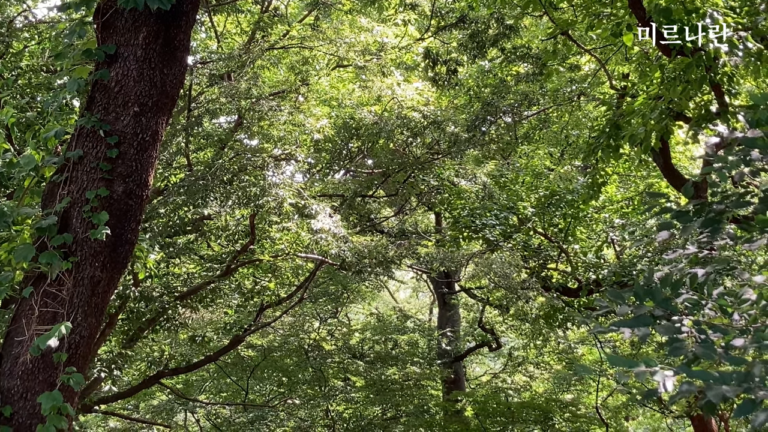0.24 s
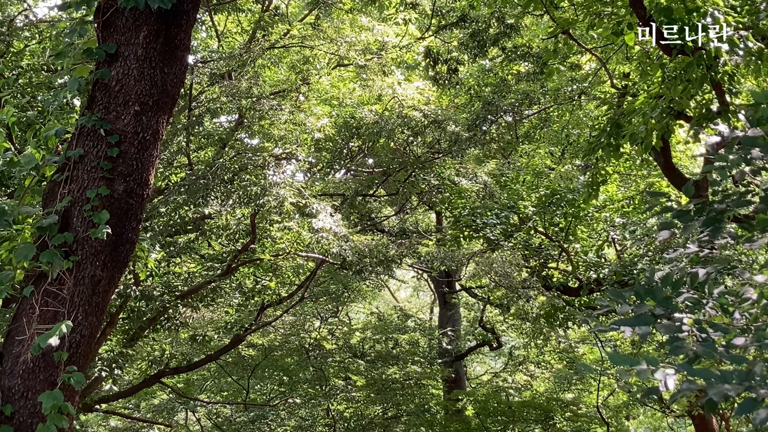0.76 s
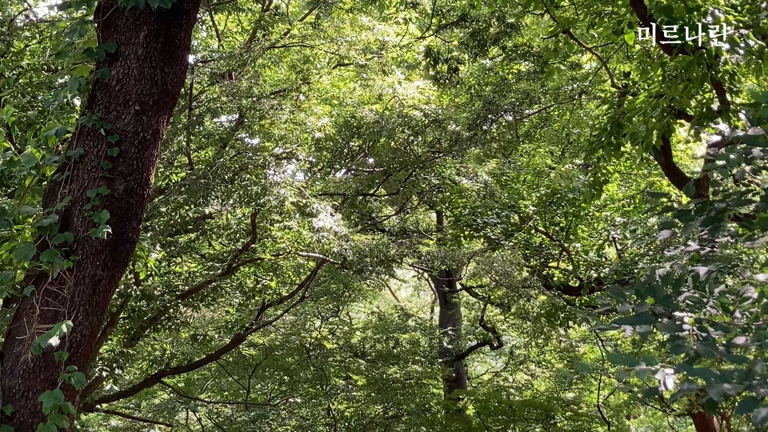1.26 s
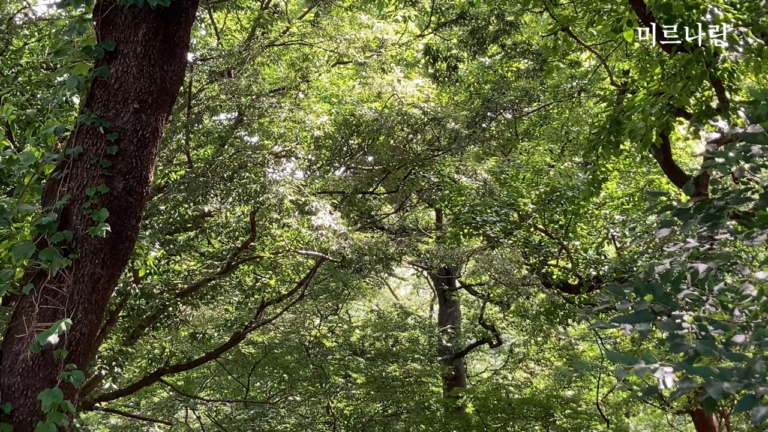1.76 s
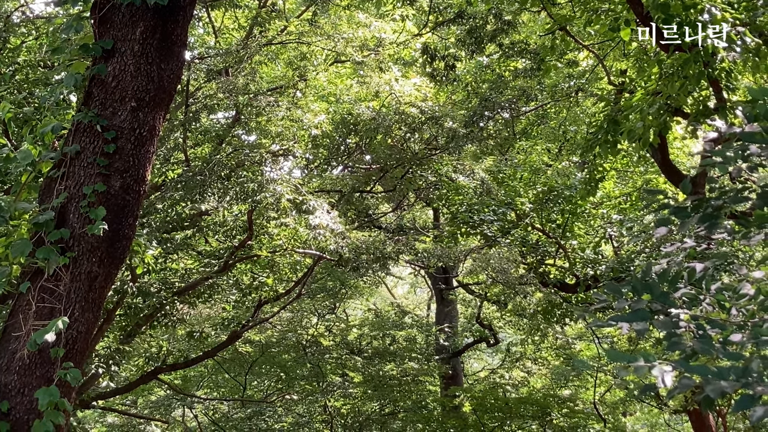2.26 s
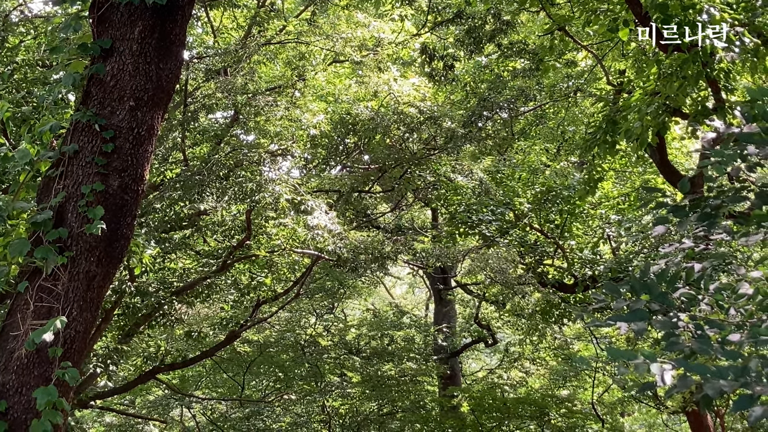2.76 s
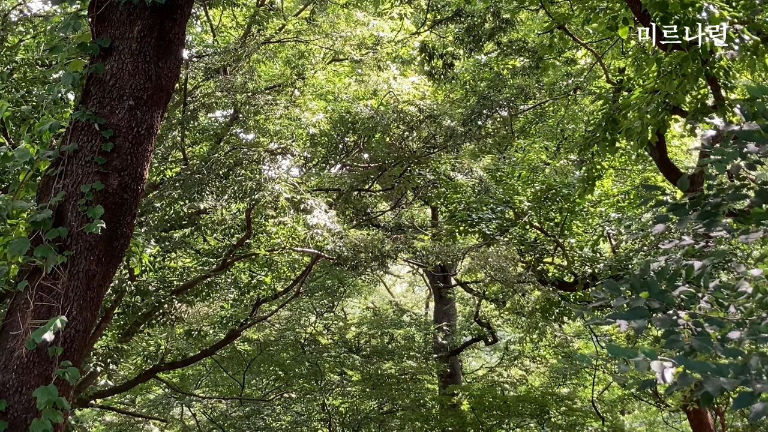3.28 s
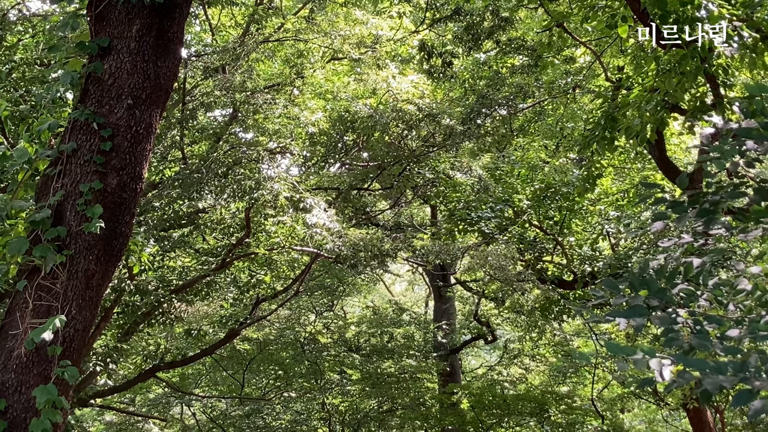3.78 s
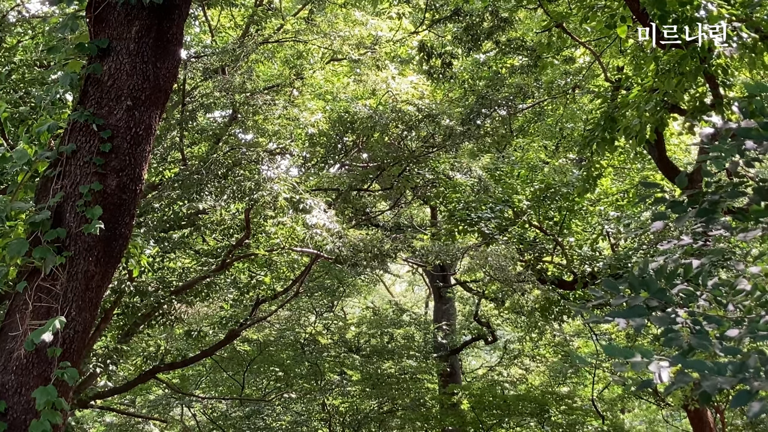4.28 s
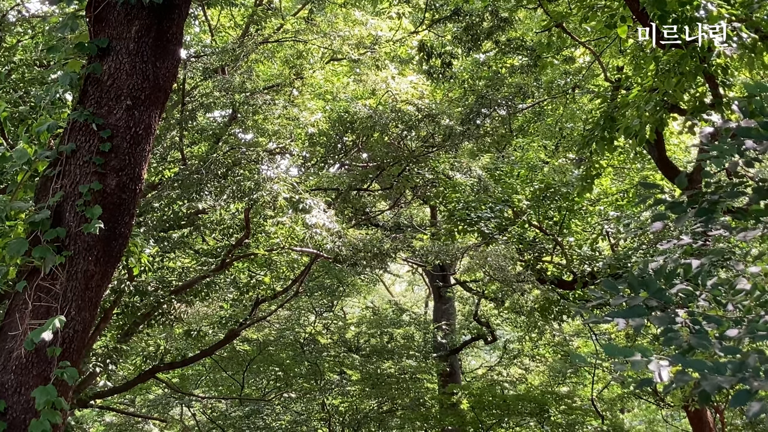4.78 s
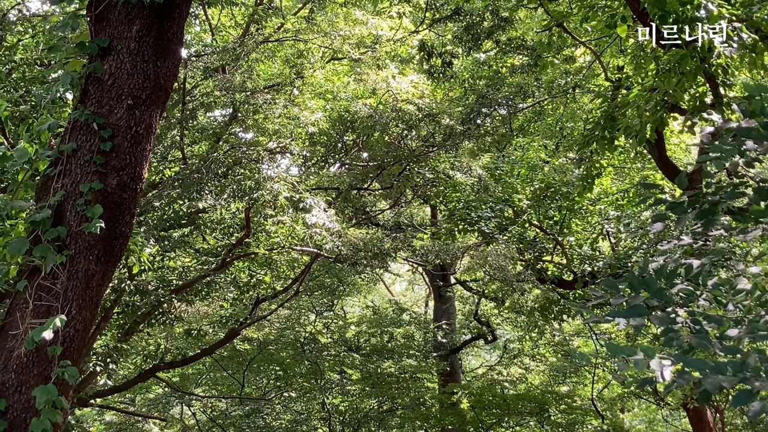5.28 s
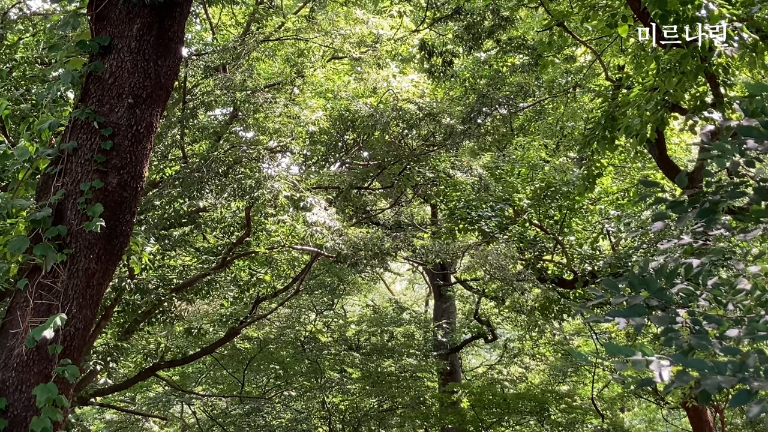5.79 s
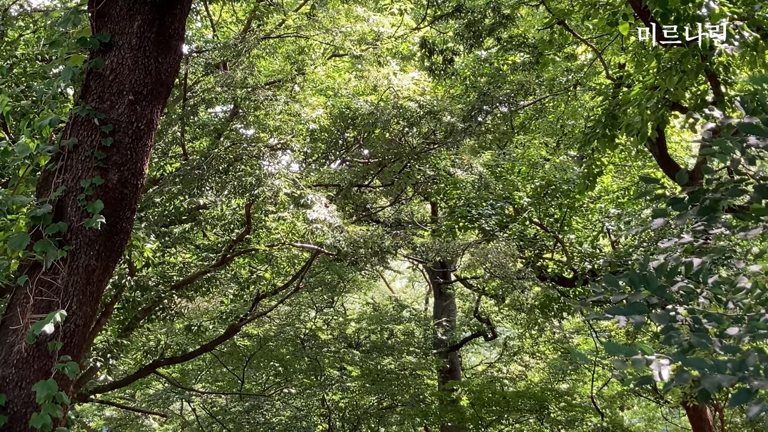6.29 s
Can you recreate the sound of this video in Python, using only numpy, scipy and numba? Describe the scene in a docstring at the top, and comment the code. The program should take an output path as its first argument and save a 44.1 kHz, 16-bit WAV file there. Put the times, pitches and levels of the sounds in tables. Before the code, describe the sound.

Stereo outdoor microphone among trees: far cicadas form a continuous airy hiss with a blurred midrange shimmer. A closer cicada wakes with a quiet drone, strengthens into regular pulsed rising buzzes, slows slightly at the end and stops. Its rapid clicking fuses into a rough tone, scattered briefly by leaves. Three dull little knocks and a faint rubbing scuff come midway, over very faint low rumble and machinery hum.

```python
"""A near cicada swells into its pulsing song: a thin buzz over a low drone, broken about twice a second by a
loud rising call. All three are fast clicks of two stiff ribbed plates (tymbals), ringing in different resonances.
Soft knocks and a scuff are short decaying tones and rubbed noise, close by.
Far cicadas blur into a noise hiss, and a second kind holds a band near 4.5 kHz with blurred clicks.
Behind them lies low noise and the hum of distant machinery, made of narrow noise resonances."""
import sys
import numpy as np
from scipy import signal
from scipy.fft import rfft, irfft, next_fast_len
from scipy.io import wavfile
from scipy.ndimage import uniform_filter1d
from numba import njit

SR = 44100
rng = np.random.default_rng(int(sys.argv[2]) if len(sys.argv) > 2 else 0)


def file_out(sig):
    """Save sig as 16-bit WAV at sys.argv[1]."""
    # one column per channel
    cols = np.atleast_2d(sig).T
    # limit, then scale
    lim = np.clip(cols, -1, 1)
    pcm = np.round(lim * 32767).astype(np.int16)
    wavfile.write(sys.argv[1], SR, pcm)


N = 288414   # length in samples

WAKE_S, END_S = 0.47, 5.4   # the song starts softly, and ends
# The near cicada's calls, one row for each lift of the abdomen; levels are before the final mix.
# Columns: lift_s, burst_db, held_db (before the sag), held_until_s (after the lift), drone_after_db,
#   buzz_at_lift_db, buzz_lowest_db, buzz_back_db, tempo_after_hz (buckles of one tymbal),
#   burst_extra_hz (more buckles), sweep_slowness (1 = usual), sweep_reach (0-1), throb_db (half the dip)
CALLS = [(1.209, -36, -35.5, .19, -48, -40, -50, -47, 160.4, 2, 1.15, 1.1, .5),
         (1.771, -30, -37, .3, -50, -35, -43, -40, 167, 6, .7, 1.0, 2.5),
         (2.33, -29, -33, .2, -45, -31, -39, -38, 170.2, 7.5, .9, 1.0, 2.0),
         (2.86, -27, -33.5, .2, -46, -31.5, -42, -34, 171.7, 7.5, 1.0, 1.0, 1.0),
         (3.39, -27, -31.5, .19, -45, -29.5, -52, -32, 173.1, 6.5, 1.0, 1.0, 1.5),
         (3.93, -26.5, -33.5, .2, -45, -29.5, -50, -30, 174.5, 6, 1.0, .8, .5),
         (4.45, -28.5, -31.5, .2, -44.5, -27, -48, -27, 172.5, 7, 1.1, .7, 2.5),
         (4.92, -32, -32, .28, -55, -30, -64, -64, 172, 0, 2.0, .2, 2.5)]
# How the tempo hurries around a lift. Columns: after_lift_s, share_of_extra_buckles (0-1)
TEMPO_HURRY = [(-.2, 0), (0, .25), (.035, 1), (.08, .9), (.2, 0)]
# The steady tempo is held between these two times. Values: after_lift_s
STEADY_TEMPO_S = (.2, .4)


def song_levels():
    """Levels of call, drone and buzz and the tempo, all set by the lifts of the abdomen."""
    t = np.arange(N) / SR
    lift, burst, held, until, drone, top, low, back, rest, extra, _, _, throb = np.transpose(CALLS)
    call_db = call_levels(t, lift, burst, held, until, throb)

    # The drone sinks slightly toward each lift, drops away, then comes back.
    before = np.r_[-55, drone[:-1]]
    gone = before - 21
    at = lift[:, None] + [0, .17, .13, .19]   # at the lift, two points of the gap, back
    levels = np.c_[before - 2.5, gone, gone, drone]
    drone_db = np.interp(t, np.r_[WAKE_S, at.ravel()], np.r_[-55, levels.ravel()])

    at = lift[:, None] + [0, .098, .34]   # buzz at the lift, lowest, back
    buzz_db = np.interp(t, np.r_[WAKE_S, at.ravel()], np.r_[-58, np.c_[top, low, back].ravel()])
    buzz_db = uniform_filter1d(buzz_db, size=2200)   # rounded swells

    slowing_per_s2 = 58   # after the last lift the song runs down: buckles per s lost each s
    per_s = np.interp(t, (lift[:, None] + STEADY_TEMPO_S).ravel(), np.repeat(rest, 2))
    per_s = per_s - slowing_per_s2 * np.clip(t - lift[-1], 0, END_S - lift[-1])
    for s, more in zip(lift, extra):
        per_s = per_s + more * np.interp(t - s, *np.transpose(TEMPO_HURRY))
    return call_db, drone_db, buzz_db, per_s


def call_levels(t, lift, burst, held, until, throb):
    """Each call jumps to a burst, settles, sags while it throbs, then is let go; the loudest call wins."""
    attack_s, burst_s, settle_s = .026, .03, .031   # rise, length of the burst, fall to the held level
    attack_db, throb_hz = 14.5, 9.8
    sag_db_per_s, release_db_per_s = 27, 144   # the release adds to the sag
    corners_s = np.cumsum([0, attack_s, burst_s, settle_s])
    level = np.where(t < lift[0], -56.5, -90.)   # a soft call before the first lift
    for s, burst_db, held_db, hold_s, throb_db in zip(lift, burst, held, until, throb):
        u = t - s
        shape = np.interp(u, corners_s, [burst_db - attack_db, burst_db, burst_db, held_db])
        shape = shape - sag_db_per_s * np.clip(u - corners_s[-1], 0, None)
        shape = shape + throb_db * (np.cos(2 * np.pi * throb_hz * (u - attack_s)) - 1)
        outside_s = np.clip(np.maximum(u - hold_s, -u), 0, None)
        level = np.maximum(level, shape - release_db_per_s * outside_s)
    return level


# The abdomen's sweep after a lift, at usual slowness and full reach.
# Columns: after_lift_s, resonance_hz, second_tymbal_size (0-1, against the first)
ABDOMEN_SWEEP = [(0, 2450, .8), (.015, 2900, .8), (.028, 3850, .75), (.045, 4000, .6), (.06, 4450, .25),
                 (.1, 4650, .15), (.15, 4300, .2), (.2, 3800, .3), (.36, 3600, .3)]
# Fixed resonances of the body in the call. Columns: pitch_hz, width_hz, level_db (before it wavers)
BODY_MODES = [(2470, 345, 3), (3560, 590, 1), (3867, 450, 4.5), (4530, 206, 4), (4900, 320, -2.5)]


def rising_call(per_s, since, reach):
    """Clicks ring the body, then a hollow abdomen whose resonance moves after each lift."""
    after, hz, second = np.transpose(ABDOMEN_SWEEP)
    middle_hz, wobble_hz, width_hz = 4200, 130, 950   # width of each of the two passes
    hz = middle_hz + reach * (np.interp(since, after, hz) - middle_hz) + wobble_hz * drift(13.5)
    twice_cos = 2 * np.cos(2 * np.pi * hz / SR)
    r = np.exp(-np.pi * width_hz / SR)
    call = clicks(per_s, np.interp(since, after, second), jitter_s=1.1e-5, uneven_db=2)
    call = resonate(call, BODY_MODES, waver_db=3.5)
    call = moving_resonance(moving_resonance(call, twice_cos, r), twice_cos, r)
    return evened(call, size=900)


# Low resonances of the drone. Columns: pitch_hz, width_hz, level_db (before it wavers)
DRONE_MODES = [(2150, 300, -7), (2580, 380, 0), (3080, 380, -3)]
# The drone's favoured pitch glides among low partials. Columns: time_s, pitch_hz
DRONE_GLIDE = [(.47, 2380), (.8, 2360), (.88, 2610), (1.2, 2480), (1.4, 3000), (1.62, 3200), (1.66, 2530),
               (1.79, 2500), (2.0, 2920), (2.12, 2640), (2.3, 2370), (2.37, 2490), (2.45, 3000),
               (2.8, 3020), (2.87, 2480), (3.0, 3090), (3.24, 3060), (3.27, 2620), (3.43, 2660),
               (3.54, 3290), (3.58, 3240), (3.6, 2670), (3.82, 2690), (3.86, 2520), (3.96, 2410),
               (4.1, 2690), (4.3, 2680), (4.33, 2430), (4.48, 2390), (4.6, 2610), (4.75, 2640),
               (4.77, 2410), (4.81, 2430), (4.83, 3100), (5.0, 3100)]


def low_drone(per_s):
    """Clicks ring low resonances; a narrow gliding one lifts the partials near it above the rest."""
    stack = resonate(clicks(per_s, second=.3, jitter_s=4e-6, uneven_db=.7), DRONE_MODES, waver_db=3)
    stack = resonate(stack, [(2700, 1200, 0)])
    twice_cos = 2 * np.cos(2 * np.pi * in_time(DRONE_GLIDE)[0] / SR)
    width_hz = 125
    favoured = moving_resonance(stack, twice_cos, np.exp(-np.pi * width_hz / SR))
    return evened(favoured, size=2000) + from_db(-6.5) * rms_one(stack)


# High resonances of the tymbal ribs. Columns: pitch_hz, width_hz, level_db
BUZZ_MODES = [(12730, 1560, -2), (13960, 770, 2), (14900, 1170, 0.5), (15600, 930, -2.5)]


def high_buzz(per_s):
    """The same rhythm of clicks rings the ribs of the tymbals far up in the treble."""
    buzz = resonate(clicks(per_s, second=.5, jitter_s=6e-6, uneven_db=1.5), BUZZ_MODES)
    return rms_one(resonate(buzz, [(14000, 4000, 0)]))


def cicada():
    """The tymbal clicks sound the abdomen, drone and buzz, and the wood scatters the song."""
    call_db, drone_db, buzz_db, per_s = song_levels()
    lifts, *_, slowness, reach, _ = np.transpose(CALLS)
    t = np.arange(N) / SR
    which = np.clip(np.searchsorted(lifts - .02, t) - 1, 0, None)   # the call in progress
    since = (t - lifts[which]) / slowness[which]
    # The tempo wavers, most before the first call.
    unsteady = np.where(t < lifts[0], .006, np.where(since < .2, .002, .0011))
    per_s = per_s * (1 + unsteady * drift(14))

    song = from_db(call_db) * rising_call(per_s, since, reach[which])
    song = song + from_db(drone_db) * low_drone(per_s)
    song = song + from_db(buzz_db) * high_buzz(per_s)
    song = song * np.interp(t, [WAKE_S - .1, WAKE_S, END_S, END_S + .1], [0, 1, 1, 0])

    # Leaves move, so the echoes favour other partials from moment to moment.
    sway = .8 * drift(6)
    echoes = scattered(song * np.cos(sway), t60=.09) + scattered(song * np.sin(sway), t60=.09)
    return from_db(-3) * song + from_db(-3.2) * echoes


def clicks(per_s, second, jitter_s, uneven_db):
    """Left and right tymbal buckle in turn; every second click has its own size against the first."""
    half_cycles = 2 * np.cumsum(per_s) / SR
    count = np.arange(1, int(half_cycles[-1]) - 2)
    chance = rng.standard_normal((len(count), 2))
    at = np.interp(count, half_cycles, np.arange(N)) + jitter_s * SR * chance[:, 0]
    whole = np.clip(at.astype(int), 12, N - 1)
    size = np.where(count % 2, (second * np.ones(N))[whole], 1)
    size = size * from_db(uneven_db * chance[:, 1])
    # A short smooth pulse places each click between samples.
    out, taps = np.zeros(N + 40), np.arange(-12, 13)
    offset = whole[:, None] + taps - at[:, None]
    pulse = np.sinc(offset) * np.cos(offset * np.pi / 26) ** 2
    np.add.at(out, whole[:, None] + taps, size[:, None] * pulse)
    return out[:N]


def scattered(x, t60):
    """Trunks and leaves return a short dense scatter of power 1, in three unrelated versions."""
    t = np.arange(int(t60 * SR)) / SR
    tail = rng.standard_normal((3, len(t))) * from_db(-60 * t / t60)
    return signal.fftconvolve(x[None], tail / np.linalg.norm(tail[0]), axes=1)[:, :N]


# Soft knocks. Columns: start_s, level_db (before decay and left-right balance), pitch_hz
KNOCK_TONES = [(3.087, -45, 353.7), (3.263, -42, 500), (3.695, -34.5, 530)]
# Parts of the scuff. Columns: start_s, length_s, level_db (before flicker and left-right balance)
SCUFF_PARTS = [(4.072, .015, -62), (4.118, .04, -53)]


def knocks():
    """Dull knocks are tones that die in a couple of cycles; the scuff is flickering resonant noise."""
    out, t = np.zeros(N), np.arange(int(.03 * SR)) / SR
    for s, db, hz in KNOCK_TONES:
        at = round(s * SR)
        out[at:at + len(t)] += from_db(db) * np.sin(2 * np.pi * hz * t) * np.exp(-t / 0.0033)
    rub = rms_one(resonate(rng.standard_normal(N), [(640, 90, 1), (980, 300, -11)]))
    t, edge_db_per_s = np.arange(N) / SR, 1400
    span = 0
    for s, length, db in SCUFF_PARTS:
        outside_s = np.clip(np.maximum(s - t, t - s - length), 0, 1)
        span = span + from_db(db - edge_db_per_s * outside_s)
    out = out + span * from_db(2.4 * drift(60)) * rub
    return out * from_db([[1.1], [-1.1]])   # a little louder on the left


# Colour of the far hiss, relative. Columns: pitch_hz, level_db (per Hz)
HISS_COLOUR = [(1100, -32), (1900, -24), (2500, -22), (3000, -14), (3500, -4), (4100, -3), (5000, -3.5),
               (6000, -3), (7300, -5), (8300, -1), (9000, -2), (10000, -7), (12000, -12.5), (14000, -16),
               (16000, -16.5)]
# Slow swells, before the mix. Columns: time_s, hiss_db, band_db (before it wavers)
FAR_SWELL = [(0.0, -32, -37), (1.05, -32, -37), (1.31, -31.5, -40), (2.66, -31, -39.5), (3.04, -31, -40.5),
             (3.45, -31.5, -39.5), (4.32, -32, -40.5), (4.55, -31.5, -36.5), (4.95, -32, -45.5),
             (5.21, -33, -35), (5.96, -33, -36), (6.54, -34.5, -37)]
# Resonances of the second kind, passed through twice. Columns: pitch_hz, width_hz, level_db (each pass)
BAND_MODES = [(2580, 530, -7.5), (3043, 200, -2), (3616, 440, -0.5), (4623, 220, 0)]
# Average buckles of one tymbal, a far singer each. Values: rate_hz
FAR_TEMPOS_HZ = [116.9, 117.7, 118.4, 119.2, 120.1]


def chorus():
    """Countless far cicadas merge into hiss; a few singers of a second kind keep blurred lines in their band."""
    hiss_db, band_db = in_time(FAR_SWELL)
    hiss = from_db(hiss_db) * coloured(HISS_COLOUR, patchy_db=1.28, count=7)
    singers = 0
    for hz in FAR_TEMPOS_HZ:
        per_s = hz * (1 + .005 * drift(3))
        singers = singers + clicks(per_s, second=.7, jitter_s=1.8e-5, uneven_db=3)
    crowd = rms_one(scattered(singers, t60=.3)) + .55 * rng.standard_normal((3, N))
    band = rms_one(resonate(resonate(crowd, BAND_MODES), BAND_MODES))
    return hiss + from_db(band_db + .9 * drift(8)) * band


# Colour of the low rumble, relative. Columns: pitch_hz, level_db (per Hz)
RUMBLE_COLOUR = [(25, -26), (38, -41), (52, -8), (80, -7), (190, -12.5), (330, -13.5), (400, -18.5),
                 (600, -18.5), (1000, -21), (1500, -20.5), (2000, -23)]
# Tones of the far hum, before the mix. Columns: pitch_hz, width_hz, level_db
HUM_TONES = [(56.2, 7.3, -62.5), (124.5, 4.5, -71), (218.2, 8.7, -65), (327, 3.2, -68)]


def distance():
    """Coloured noise rumbles; narrow resonances turn noise into the wavering hum of far machinery."""
    white = rng.standard_normal((3, N))
    hum = 0
    for hz, width_hz, db in HUM_TONES:
        hum = hum + from_db(db) * rms_one(resonate(white, [(hz, width_hz, 0)]))
    return from_db(-57) * coloured(RUMBLE_COLOUR, patchy_db=2.5, count=4) + hum


# Stereo phase lead, shared power and left-right balance at each pitch.
# Columns: pitch_hz, right_lead_turns (of phase), common_share (0-1, of the power), left_over_right_db
STEREO_IMAGE = [(0, 0, .95, 1.1), (300, .03, .75, 1.8), (700, .13, .3, .6), (1900, .5, .5, .4),
                (3300, .5, .25, 1.2), (5700, -.45, .25, -2.2), (6400, -.1, .3, -1.1), (6900, 0, .9, 0),
                (9150, .5, .98, 0), (11300, 1.0, .97, 0), (12600, 1.2, .9, 0), (13600, 1.5, .98, 0),
                (15300, 1.96, .97, 0), (17000, 2.1, .97, 0)]


def pair(common, left, right):
    """One part reaches both sides with a phase lead, the other parts are each side's own."""
    size = next_fast_len(N)
    hz = np.arange(size // 2 + 1) * SR / size
    at, turns, share, tilt_db = np.transpose(STEREO_IMAGE)
    share, sides = np.clip(np.interp(hz, at, share), 0, 1), np.array([[-1], [1]])
    lead = np.exp(1j * np.pi * np.interp(hz, at, turns) * sides)
    both = np.sqrt(share) * lead * rfft(common, size)
    both = both + np.sqrt(1 - share) * rfft([left, right], size)
    return irfft(both * from_db(-sides * np.interp(hz, at, tilt_db) / 2), size)[:, :N]


def coloured(spectrum, patchy_db, count):
    """Three unrelated noises of one colour, cut into overlapping bands that flicker each on its own; rms 1."""
    size = next_fast_len(N)
    hz = np.arange(1, size // 2 + 2) * SR / size
    at, db = np.transpose(spectrum)
    colour = from_db(np.interp(np.log(hz), np.log(at), db, -90, -90))
    shaped = rfft(rng.standard_normal((3, size))) * colour
    place, out = (count - 1) * np.log(hz / at[0]) / np.log(at[-1] / at[0]), 0
    for k in range(count):
        band = np.clip(1 - abs(place - k), 0, 1)
        out = out + irfft(shaped * band, size)[:, :N] * from_db(patchy_db * drift(14.0))
    return rms_one(out)


def resonate(x, modes, waver_db=None):
    """Parallel resonances with alternating signs; each may waver in strength on its own."""
    out = 0
    for k, (hz, width_hz, db) in enumerate(modes):
        r = np.exp(-np.pi * width_hz / SR)
        a = [1, -2 * r * np.cos(2 * np.pi * hz / SR), r * r]
        db = db + waver_db * drift(12) if waver_db else db
        ring = signal.lfilter([(1 - r * r) / 2, 0, (r * r - 1) / 2], a, x)
        out = out + (-1) ** k * from_db(db) * ring
    return out


@njit
def moving_resonance(x, twice_cos, r):
    """A two-pole resonance whose centre moves sample by sample."""
    y = np.zeros(len(x))
    for i in range(2, len(x)):
        y[i] = x[i] - x[i - 2] + r * twice_cos[i] * y[i - 1] - r * r * y[i - 2]
    return y


def evened(x, size):
    """Divide by the running rms over size samples, so the level stays even as a resonance moves."""
    return x / np.sqrt(uniform_filter1d(x ** 2, size=size) + 1e-12)


def drift(rate):
    """Slow random wandering of rms 1, made at one fortieth of the sample rate; a higher rate is faster."""
    r = np.exp(-80 * np.pi * rate / SR)
    noise = rng.standard_normal(N // 40 + 2002)
    slow = signal.lfilter([1], [1, -2 * r, r * r], noise)[2000:]   # skip the filter's start
    return np.interp(np.arange(N) / 40, np.arange(len(slow)), rms_one(slow))


def in_time(rows):
    """Columns of a curve table at every sample."""
    s, *columns = np.transpose(rows)
    return [np.interp(np.arange(N) / SR, s, c) for c in columns]


def from_db(db):
    """dB to gain."""
    return 10 ** (np.asarray(db) / 20)


def rms_one(x):
    """Scale to rms 1."""
    return x / np.sqrt(np.mean(x ** 2) + 1e-20)


def scene():
    """Near singer, far chorus and rumble spread over the pair of sides; the knocks are close by."""
    return pair(*(cicada() + chorus() + distance())) + knocks()


def record(dry):
    """The top is cut steeply above 15740 Hz."""
    return signal.sosfilt(signal.ellip(12, .5, 70, 15740, fs=SR, output="sos"), dry)


dry = scene()
out = record(dry)
file_out(out)
```